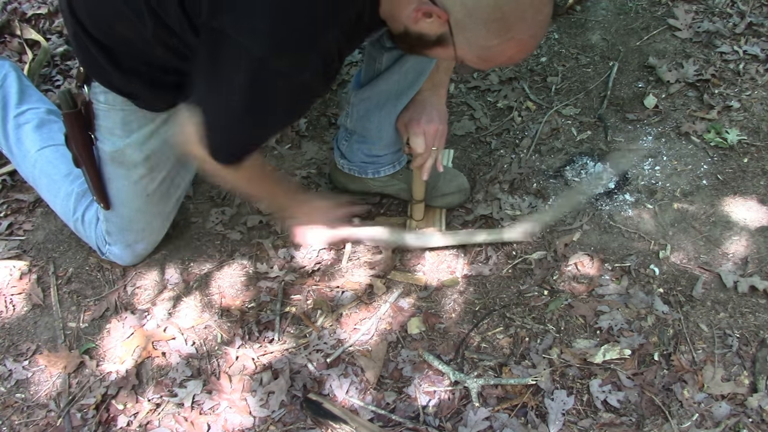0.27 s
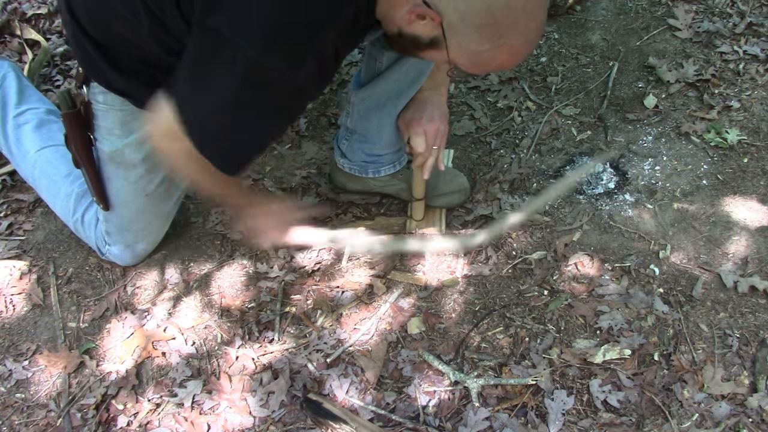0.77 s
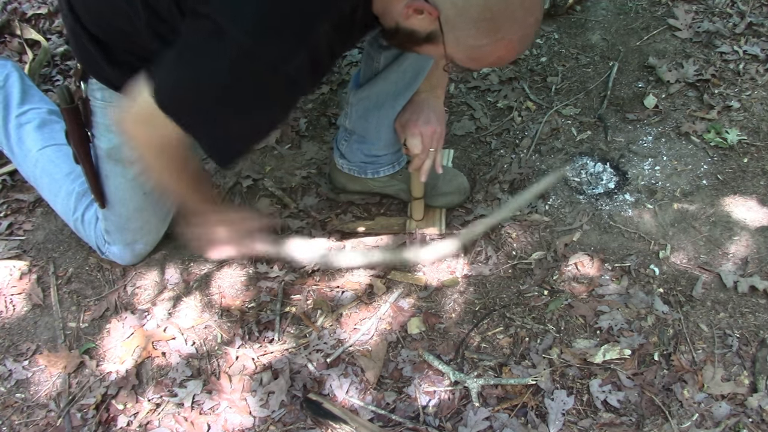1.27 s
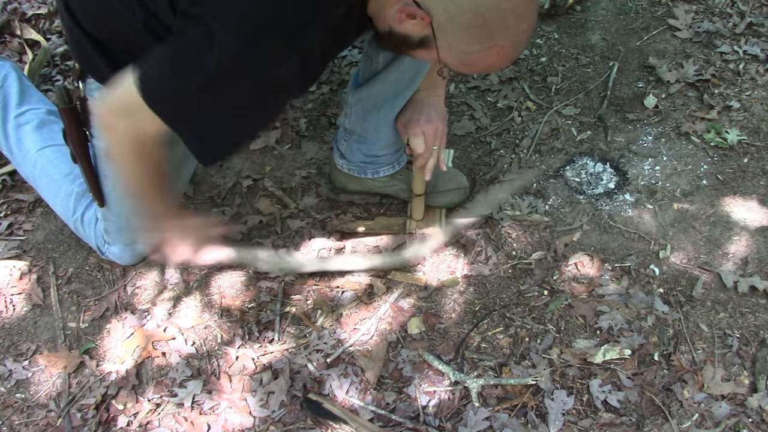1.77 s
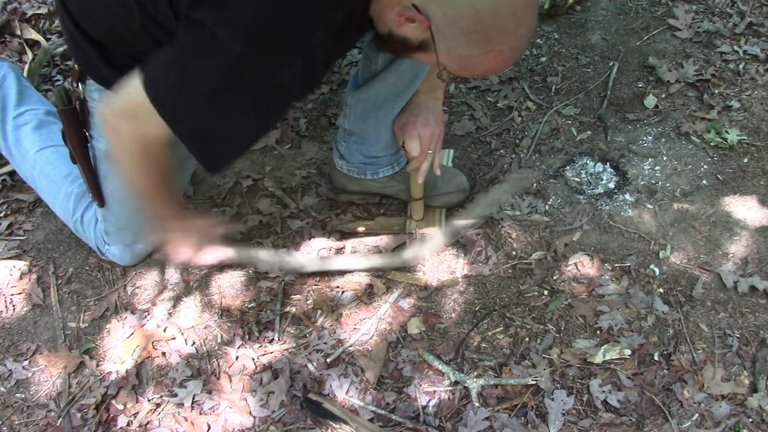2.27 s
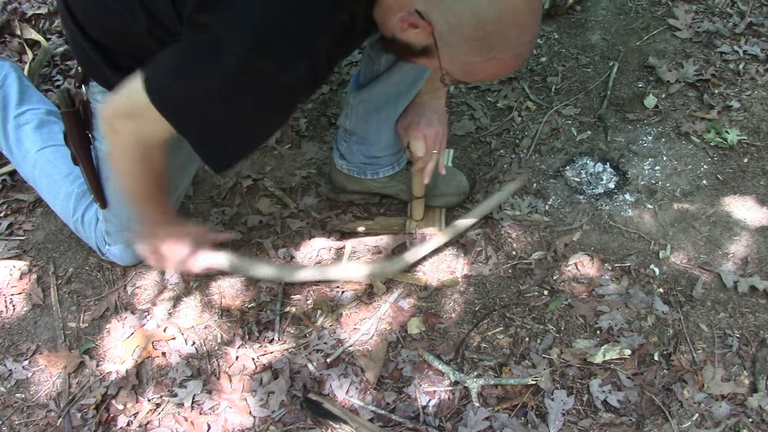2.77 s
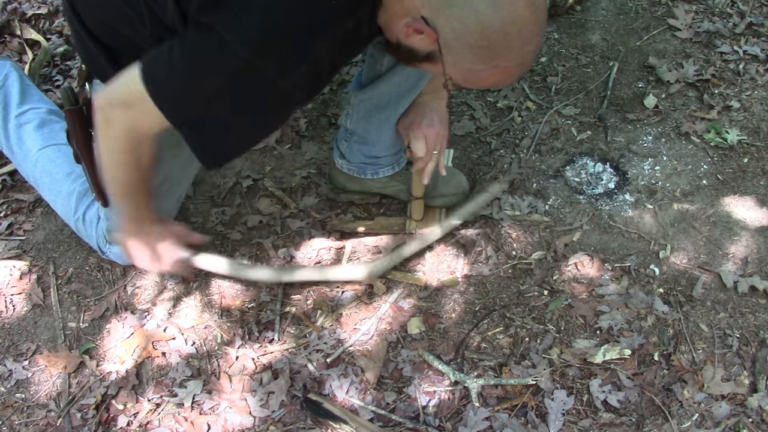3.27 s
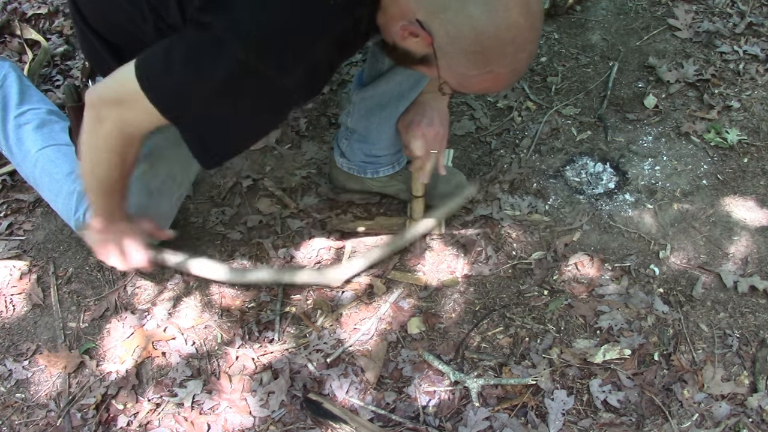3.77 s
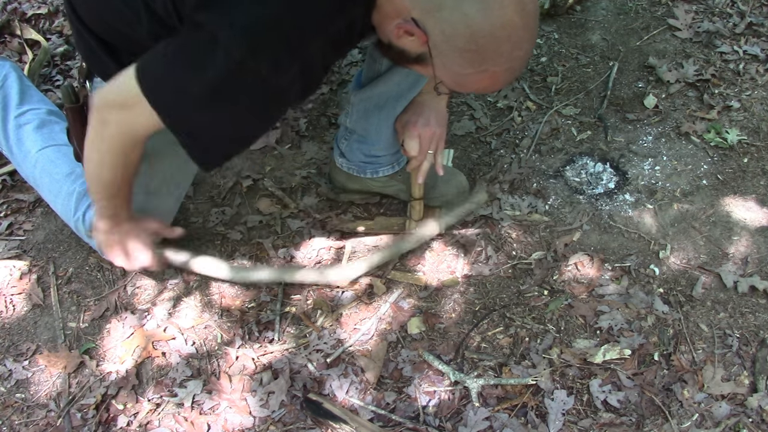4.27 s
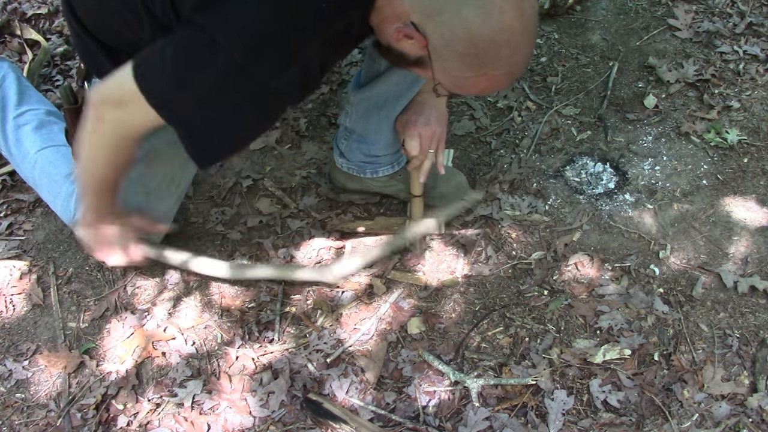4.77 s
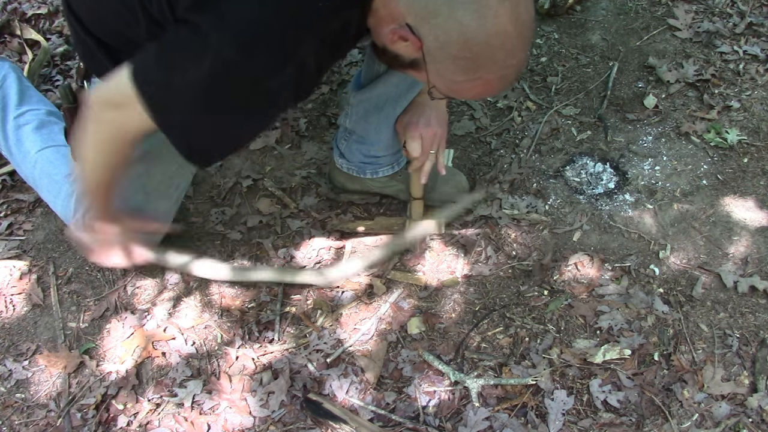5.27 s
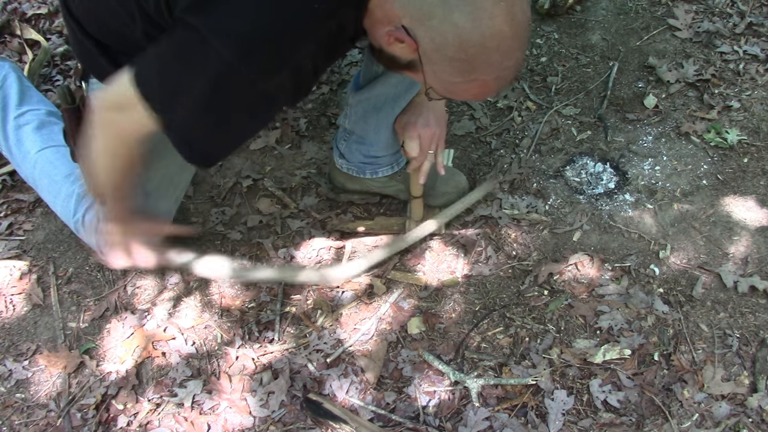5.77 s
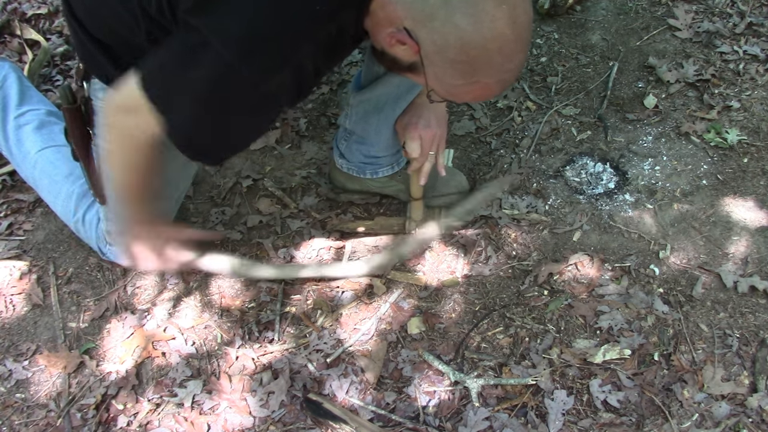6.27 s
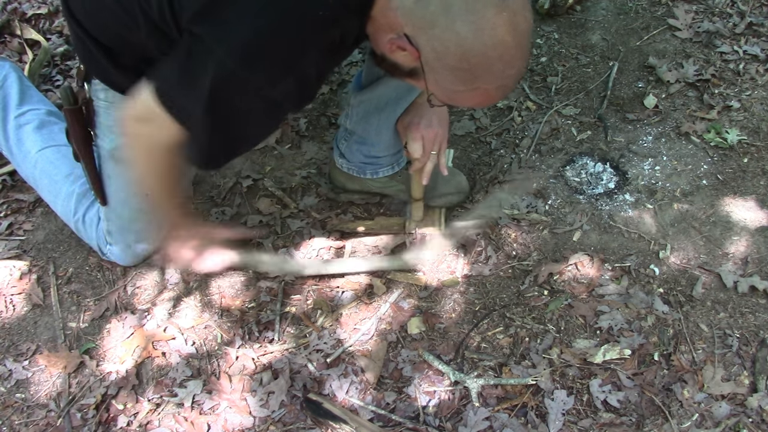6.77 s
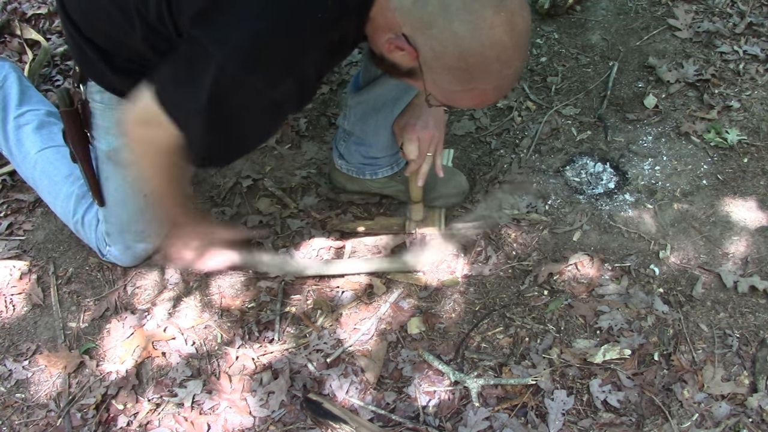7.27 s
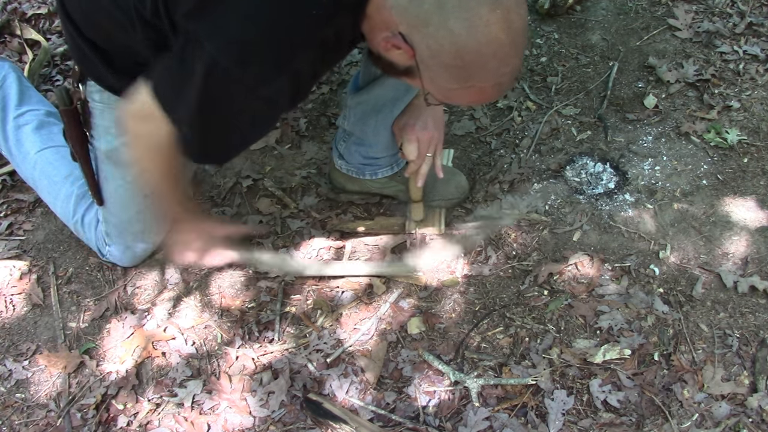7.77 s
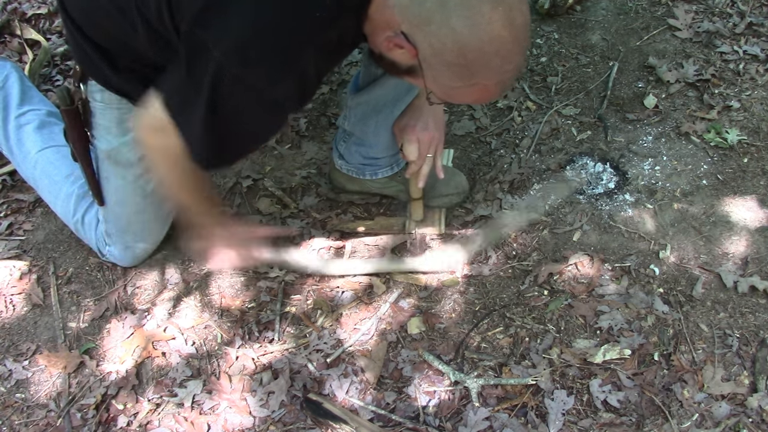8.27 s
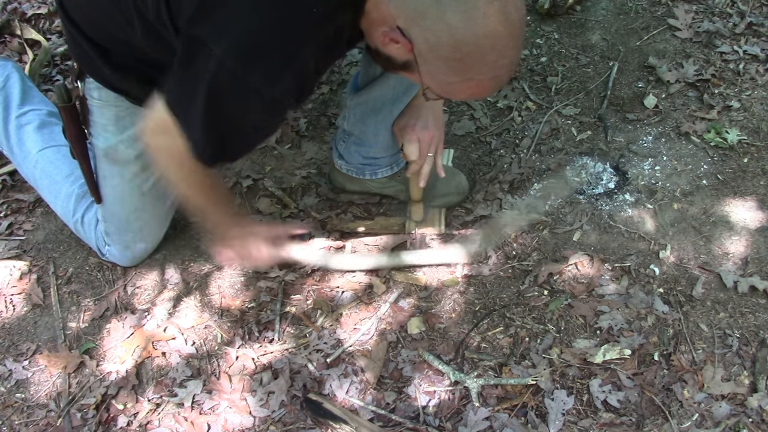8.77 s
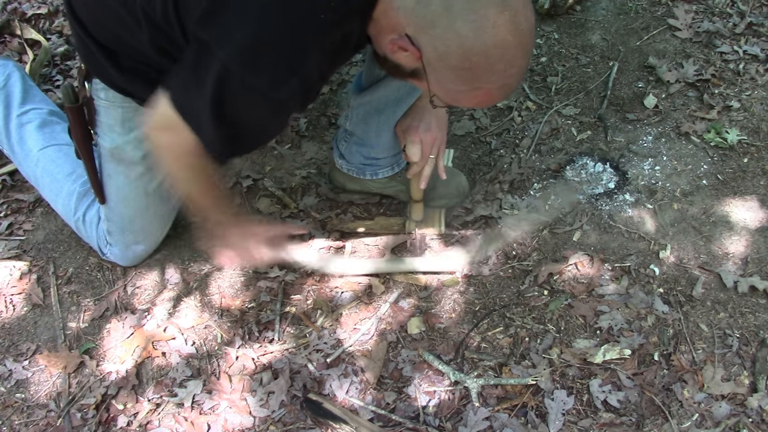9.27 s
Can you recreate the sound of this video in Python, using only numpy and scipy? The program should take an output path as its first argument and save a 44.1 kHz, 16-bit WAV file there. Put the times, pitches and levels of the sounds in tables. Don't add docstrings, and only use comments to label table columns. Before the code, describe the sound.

Bow drill sawing fast in the woods, each stroke a dry wooden rasp ringing high, with short piercing squeals as the spindle grabs the board

```python
import sys
import numpy as np
from scipy import signal
from scipy.fft import rfft, irfft, next_fast_len
from scipy.io import wavfile
from scipy.ndimage import uniform_filter1d

SR = 44100
rng = np.random.default_rng(int(sys.argv[2]) if len(sys.argv) > 2 else 0)


def dump_mix(stems):
    frames = np.atleast_2d(stems).T
    limited = np.clip(frames, -1, 1)
    pcm = np.round(limited * 32767).astype(np.int16)
    wavfile.write(sys.argv[1], SR, pcm)


def invert_db(x):
    u = np.asarray(x, float) / 20
    return 10 ** u


N = 420273


def rms_one(x):
    return x / np.sqrt(np.mean(x ** 2) + 1e-20)


def band_one(x, low_hz, high_hz):
    band = signal.butter(4, [low_hz, high_hz], "band", fs=SR, output="sos")
    return x / np.sqrt(np.mean(signal.sosfilt(band, x) ** 2))


def colour(x, points):
    size = next_fast_len(N + 4096)
    hz = np.arange(size // 2 + 1) * SR / size + 1
    points_hz, points_db = np.transpose(points)
    db = np.interp(np.log(hz), np.log(points_hz), points_db)
    return irfft(rfft(x, size) * invert_db(db), size)[..., :N]


def closed(points):
    (first_hz, first_db), (last_hz, last_db) = points[0], points[-1]
    return [(first_hz / 2, first_db - 30)] + list(points) + [(last_hz, last_db - 30)]


def drift(rate_hz):
    r = np.exp(-2 * np.pi * rate_hz / SR)
    settle = 20000
    noise = rng.standard_normal(N + settle)
    return rms_one(signal.lfilter([1], [1, -2 * r, r * r], noise)[settle:])


def grit(per_s, spread_db, lumpy_db):
    sizes = invert_db(spread_db * np.minimum(rng.exponential(1, N), 5))
    signs = rng.choice([-1, 1], N)
    torn = rng.random(N) < per_s / SR
    return rms_one(sizes * signs * torn * invert_db(lumpy_db * drift(45)))


def resonate(x, hz, width_hz):
    turn = np.exp(2j * np.pi * np.cumsum(hz * np.ones(N)) / SR)
    low = signal.lfilter([1], [1, -np.exp(-np.pi * width_hz / SR)], x / turn)
    return rms_one(np.real(low * turn))


# frequency in Hz, level in dB per Hz.
WOODS_COLOUR = [(15, -14.5), (25, 15), (68, 7), (523, -6), (1200, -12.5), (1850, -12), (2420, -30),
                (3170, -24), (3530, -46), (4260, -29), (5730, -40), (6730, -24), (8350, -22.5),
                (15500, -33.5)]
# frequency in Hz, side over mid in dB.
WOODS_WIDTH = [(30, -32.5), (300, -19.5), (1000, -14), (2400, -19), (4400, -25), (8000, -7.5), (15000, 4)]


def woods():
    mid, side = colour(rng.standard_normal((2, N)), WOODS_COLOUR)
    scale = invert_db(-50 + 0.34 * drift(8)) / np.std(mid)
    hum = invert_db(-52.5) * resonate(rng.standard_normal(N), hz=63.2, width_hz=22)
    return scale * mid + hum, scale * colour(side, WOODS_WIDTH)


def trees(x, t60):
    t = np.arange(SR) / SR
    build_up = np.clip((t - .012) / .045, 0, 1)
    answer = rng.standard_normal((2, SR)) * invert_db(-60 * t / t60) * build_up
    answer /= np.sqrt(np.sum(answer[0] ** 2))
    mid, side = signal.fftconvolve(x[None], answer, axes=1)[:, :N]
    return mid, colour(side, [(3100, -14.5), (6200, -5)])


# peak in dB, centre in Hz, length in seconds.
CRACK_SOUNDS = [(-39, 9800, .003), (-34, 6000, .004), (-38, 4590, .004), (-37, 4300, 0.0043),
                (-33.5, 9300, .004), (-34, 8300, .004), (-26, 3800, .004), (-26.5, 8500, .004),
                (-41, 4600, .003), (-20, 4900, 0.00067), (-21.5, 3300, .004), (-46, 7300, .002),
                (-21.5, 8900, 0.013), (-29, 9500, .004), (-26, 10000, 0.0046)]
CRACK_STARTS = [1.064, 1.078, 3.676, 5.0355, 5.054, 6.105, 7.258, 7.272, 7.3158, 7.427, 7.7598, 7.8642,
                8.8094, 8.834, 9.3132]


def cracks():
    out = np.zeros((2, N))
    t = np.arange(2000) / SR
    for start, (db, hz, length) in zip(CRACK_STARTS, CRACK_SOUNDS):
        crumble = invert_db(3 * rng.standard_normal(2000))
        burst = rng.standard_normal((2, 2000)) * crumble * np.exp(-t / max(length, .001))
        band = signal.butter(2, [hz * 0.55, min(hz * 2, 12000)], "band", fs=SR, output="sos")
        burst = signal.sosfilt(band, burst)
        snap = np.exp(-t / .0012) * np.sin(2 * np.pi * hz * t)
        burst += np.abs(burst).max() * snap
        i = round(start * SR)
        out[:, i:i + 2000] += invert_db(db + 3.5) * burst / np.abs(burst[0]).max() * invert_db([[0], [-7]])
    return out


# start in seconds, peak in dB, pitch in Hz, 60 dB decay in seconds.
KNOCK_EVENTS = [
    (.106, -51, 760, 0.082),
    (1.172, -43.5, 754, 0.041),
    (1.705, -42, 740, 0.046),
    (1.936, -50, 206, 0.037),
    (7.3252, -28, 270, 0.019),
    (7.843, -40, 394, 0.033),
]


def knocks():
    out = np.zeros(N)
    t = np.arange(6000) / SR
    push = 1 - np.exp(-t / 0.00088)
    for start, db, hz, t60 in KNOCK_EVENTS:
        i = round(start * SR)
        for ratio, mode_db in ((1, 9.5), (1.6, 5.5), (2.5, 5)):
            decay = invert_db(db + mode_db - 60 * t * ratio / t60)
            out[i:i + 6000] += decay * push * np.sin(2 * np.pi * ratio * hz * t)
    return out


# time in seconds, pitch in Hz.
CONTACT_PITCH = [(0, 3085), (2.5, 3083), (5, 3027), (7.5, 2955), (9.5, 2947)]


def contact_hz(s):
    return np.interp(s, *np.transpose(CONTACT_PITCH))


# start in seconds, rasp in dB, spindle ring early in dB, ring late in dB.
BOW_PULLS = [(0.045, -47.5, -36, -29.5), (0.579, -49.5, -40, -28.5), (1.122, -48, -33.5, -33),
             (1.64, -48, -31, -36), (2.146, -47, -32, -25.5), (2.674, -48.5, -30.5, -35.5),
             (3.19, -48.5, -32, -28.5), (3.728, -46.5, -29, -27), (4.242, -47.5, -32.5, -25),
             (4.774, -46, -29.5, -28.5), (5.29, -46.5, -30, -35), (5.809, -46.5, -29.5, -31),
             (6.326, -46.5, -33.5, -27.5), (6.839, -46, -30.5, -26.5), (7.351, -45.5, -27.5, -27.5),
             (7.847, -47, -29, -28.5), (8.358, -47.5, -33.5, -29), (8.883, -46, -29, -30),
             (9.37, -48, -34, -20)]
# start in seconds, rasp in dB, ring early in dB, ring late in dB, board in dB.
BOW_PUSHES = [(-.22, -44, -40, -42, -43), (.294, -46.5, -34, -37.5, -48.5),
              (0.83, -45.5, -33, -41.5, -49.5), (1.36, -46, -31.5, -32, -46),
              (1.892, -45.5, -31.5, -34.5, -46.5), (2.397, -46, -33.5, -32, -46.5),
              (2.91, -46, -35, -30.5, -49.5), (3.429, -46, -32, -31.5, -45.5),
              (3.972, -45, -33.5, -30.5, -42.5), (4.488, -45.5, -30.5, -32.5, -46.5),
              (5.017, -43, -29.5, -31.5, -38.5), (5.536, -44, -30, -30.5, -42),
              (6.051, -44, -29, -35.5, -40), (6.577, -45.5, -33.5, -31.5, -42),
              (7.078, -44, -32, -36.5, -38), (7.584, -44.5, -36, -35, -39), (8.092, -45.5, -35, -32, -39),
              (8.613, -46.5, -35, -35, -41.5), (9.119, -45.5, -33, -36.5, -40.5)]
# time in seconds, board in dB.
PULL_BOARD = [(0, -56.5), (3, -58), (5.2, -49), (6.7, -49), (7.5, -37.5), (8.1, -45.5), (8.6, -52.5),
              (9.5, -43)]


def strokes():
    early_share, late_share = 0.42, 0.73
    played = []
    for start, db, *ring in BOW_PULLS:
        load_db = np.interp(start, *np.transpose(PULL_BOARD))
        played.append((start, db, -0.5, ring, (load_db, load_db), (0, 105)))
    for start, db, *ring, board in BOW_PUSHES:
        played.append((start, db, 1.5, ring, (board - 19, board), (182, 134)))
    played.sort()
    ends = [row[0] for row in played[1:]] + [9.62]
    rows = []
    for (start, db, rise_db, ring, board, lift), end in zip(played, ends):
        early, late = start + early_share * (end - start), start + late_share * (end - start)
        rows += [(early, db - rise_db / 2, ring[0], board[0], lift[0]),
                 (late, db + rise_db / 2, ring[1], board[1], lift[1]),
                 (end, -65.5, -70.5, -69, 150)]
    s, *levels, lift_hz = np.transpose(rows[1:])
    return s, *levels, contact_hz(s) + lift_hz


def follow_bow(t, s, db):
    bend, rest_s = 1.1, .012
    rows = np.sort(np.r_[np.arange(len(s)), np.arange(1, len(s), 3)])
    again = (np.diff(rows) == 0).astype(int)
    at = s[rows] + rest_s * (np.r_[0, again] - np.r_[again, 0])
    return 20 / bend * np.log10(np.interp(t, at, invert_db(bend * db[rows])))


# frequency in Hz, level in dB per Hz.
RASP_COLOURS = [
    [(900, -40), (1400, -4), (1750, 6.5), (2500, 2), (3750, 1.5), (4330, 2.5), (5400, 0.5), (6270, -57.5),
     (6900, -11), (8250, -3), (9070, -12), (12000, -19.5), (15500, -62)],
    [(900, -18), (1400, 1.5), (1750, 1), (2500, 4.5), (3750, 7.5), (4390, 2), (5120, 2.5), (5980, -3),
     (6820, -12.5), (8150, -5.5), (8960, -10.5), (12000, -17), (15500, -35)],
]


def broad_rasp(fibres, t, turns, pulled):
    pull, push = [band_one(colour(fibres, closed(points)), 4394, 5185) for points in RASP_COLOURS]
    high_mode = resonate(resonate(fibres, 5580, 500), 5580, 700)
    upper = pulled * invert_db(-1 + 1.5 * drift(12)) * high_mode
    upper += pulled * invert_db(-3 + 5 * drift(25)) * resonate(fibres, 3730, 150)
    speed = np.abs(np.sin(np.pi * np.interp(t, turns, np.arange(len(turns)), -.5, .5)))
    upper += invert_db(-10) * speed ** 0.7 * resonate(fibres, hz=8150, width_hz=630)
    return np.where(pulled, pull, push) + upper


def spindle_ring(fibres, t, turns, pulled, ring_hz):
    since_turn = t - np.r_[-1, turns][np.searchsorted(turns, t)]
    hz = ring_hz + 60 * drift(27)
    hz += 350 * (1 - pulled) * np.exp(-since_turn / 0.043)
    ring = np.where(pulled, resonate(fibres, hz, 210), resonate(fibres, hz, 300))
    return rms_one(resonate(ring, hz, width_hz=1230) * invert_db(2.2 * drift(39)))


def board_mode(fibres, t, pulled, board_db):
    lead_s = 0.02
    hz = 1300 + 0.37 * (contact_hz(t) - 3040) + 40 * drift(16)
    board = resonate(resonate(fibres, hz, width_hz=200), hz, width_hz=390) * invert_db(1.9 * drift(30))
    return board * invert_db(np.interp(t + lead_s, t, board_db) - 1 - 31 * pulled)


# frequency in Hz, level in dB per Hz.
RUMBLE_COLOUR = [(120, -1), (220, -1), (400, -0.5), (600, -3), (1000, -2.5), (1600, -7)]


def soil_rumble(rasp_db, board_db):
    coarse = grit(per_s=2400, spread_db=-0.5, lumpy_db=2.5)
    return invert_db(0.61 * rasp_db + 0.41 * board_db + 1) * rms_one(colour(coarse, closed(RUMBLE_COLOUR)))


# frequency in Hz, level in dB per Hz.
SIDE_COLOUR = [(1530, -57), (2600, -64), (2700, -32), (2800, -41), (3130, -16), (4390, 3.5), (5830, 12.5),
               (8150, 0.5), (8850, -1), (12600, -6), (15500, -36)]


def rasp_side(fibres, rasp_db):
    apart = 0.84 * grit(per_s=9000, spread_db=-3, lumpy_db=2)
    apart += 0.5 * (np.roll(fibres, 1) - np.roll(fibres, -1))
    return invert_db(rasp_db - 4.5) * rms_one(colour(apart, closed(SIDE_COLOUR)))


def friction():
    t = np.arange(N) / SR
    s, *levels, ring_hz = strokes()
    rasp_db, ring_db, board_db = [follow_bow(t, s, db) for db in levels]
    turns = s[1::3]
    pulled = np.searchsorted(turns, t) % 2
    fibres = grit(per_s=9000, spread_db=1.5, lumpy_db=1.5)
    mid = invert_db(rasp_db) * broad_rasp(fibres, t, turns, pulled)
    mid += invert_db(ring_db) * spindle_ring(fibres, t, turns, pulled, np.interp(t, s, ring_hz))
    mid += board_mode(fibres, t, pulled, board_db)
    mid += soil_rumble(rasp_db, board_db)
    return mid, rasp_side(fibres, rasp_db)


# start in seconds, length in seconds, peak in dB, first pitch in Hz,
# overload of the microphone in dB.
HARD_GRABS = [(1.2328, .0175, -7.5, 3197, 3), (1.2522, .003, -14, 3250, -12),
              (1.2587, .0214, -7, 3088, 16.5), (1.2838, .0202, -9.5, 3080, 11.5),
              (2.2935, .0191, -7.5, 3075, 2.5), (2.326, .018, -8.5, 3078, 3.5),
              (3.3664, .015, -8.5, 3080, -1.5), (3.8736, .0128, -9, 3110, 2),
              (3.9044, 0.012, -7.5, 3068, 1), (5.4142, .0134, -11, 3100, -5),
              (5.431, 0.0092, -17, 3210, -25), (5.4426, .0162, -8.5, 3107, 4.5),
              (5.961, 0.014, -8.5, 3127, 8), (5.988, .017, -7.5, 3110, -13.5),
              (6.976, 0.0043, -10.5, 2780, -12), (7.4818, 0.0085, -8.5, 3054, 10),
              (7.4937, .0217, -9, 3038, 0), (7.997, 0.011, -7.5, 2982, -4),
              (8.0117, 0.00784, -9.5, 3050, 8), (8.0238, .0156, -7.5, 2955, 6.5),
              (8.0436, 0.0075, -13.5, 2895, -2)]
# start in seconds, length in seconds, peak in dB.
LIGHT_CATCHES = [(1.196, .0098, -19.5), (1.211, .005, -20.5), (2.2293, 0.0063, -19), (2.255, .013, -12.5),
                 (2.3125, 0.0037, -20), (3.338, 0.0092, -17), (3.909, .0039, -18.5), (4.362, 0.0068, -15.5),
                 (4.3954, .0049, -15), (4.8903, 0.0045, -14), (4.94, .0029, -14.5), (4.9474, 0.013, -17.5),
                 (5.201, 0.011, -18.5), (5.469, .018, -16), (5.9, 0.011, -14), (5.9324, .0101, -12.5),
                 (6.476, 0.0099, -18), (6.504, 0.0052, -18), (6.961, 0.017, -18), (6.99, 0.0077, -20),
                 (7.02, 0.0067, -16.5), (7.443, 0.014, -22), (7.468, 0.011, -15.5), (7.5214, 0.019, -17.5),
                 (7.979, 0.0071, -19), (7.984, 0.0061, -13.5), (9.036, 0.0083, -20), (9.056, 0.011, -28.5),
                 (9.0667, 0.011, -16), (9.5201, .014, -21)]


def squeals():
    heard, sent, over = np.zeros(N), np.zeros(N), np.zeros(N)
    wobble, flutter = drift(84), drift(90)
    catches = [(start, length, db, contact_hz(start) + 60.3, -1) for start, length, db in LIGHT_CATCHES]
    for start, length, db, first_hz, over_db in list(HARD_GRABS) + catches:
        i = np.arange(round((start - length) * SR), min(N, round((start + 2 * length) * SR)))
        u = (i / SR - start) / length
        rise = np.sin(np.pi / 2 * np.clip((u + 0.63) / 0.99, 0, 1)) ** 2.2
        release = np.sin(np.pi / 2 * np.clip((1.2 - u) / 0.8, 0, 1))
        hz = first_hz + 89 * (u - .17) / 0.627 + 40 * wobble[i]
        phase = 2 * np.pi * np.cumsum(hz) / SR
        level = invert_db(db + 0.66 + 0.36 * flutter[i]) * rise * release
        overtones = invert_db(3.88 * over_db - 80) * (np.sin(2 * phase) + 0.099 * np.sin(3 * phase))
        heard[i] += level * (np.sin(phase) + 0.22 * overtones)
        sent[i] += invert_db(1.66 * over_db) * level * (np.sin(phase) + overtones)
        overload = 1.02 * max(over_db, 0) * np.clip(u / 0.19, 0, 1) * (u < 1.2)
        over[i] = np.maximum(over[i], overload)
    return heard, sent, over


def gain_dip(over_db):
    ramp = 137 * np.arange(N) / SR
    held = np.maximum.accumulate(over_db + ramp) - ramp
    return invert_db(-uniform_filter1d(held, size=301))


# frequency in Hz, left over right in dB.
LEFT_LEAN = [(1500, 0.5), (3100, 1.5), (5000, 4.5), (8000, -3.5), (13000, 1.5)]


def scene():
    air, air_side = woods()
    crack, crack_side = cracks()
    rub, rub_side = friction()
    heard, sent, over = squeals()
    echo, echo_side = trees(sent + 0.79 * rub, t60=0.35)
    gain = gain_dip(over)
    near = gain * rub + heard + crack + knocks()
    left = colour(near, [(hz, db / 2) for hz, db in LEFT_LEAN])
    right = colour(near, [(hz, -db / 2) for hz, db in LEFT_LEAN])
    mid = gain * invert_db(-26) * echo + gain ** 0.58 * air
    side = gain * (invert_db(-27.5) * echo_side + air_side + rub_side) + crack_side
    return np.array([left + mid + side, right + mid - side])


def low_pass(x):
    return signal.sosfilt(signal.butter(12, 15760, fs=SR, output="sos"), x)


def record(dry):
    clip_level = 0.48
    clipped = clip_level * np.tanh(dry / clip_level)
    top = signal.ellip(8, .5, 50, 15700, fs=SR, output="sos")
    mix = signal.sosfilt(top, clipped)
    return low_pass(mix)


dry = scene()
out = record(dry)
dump_mix(out)
```